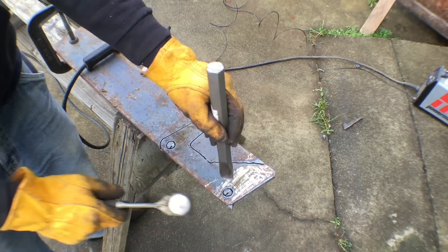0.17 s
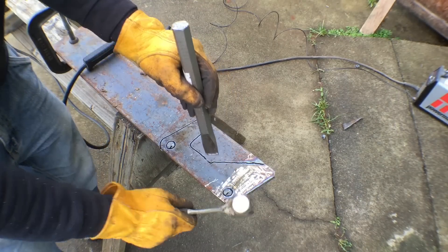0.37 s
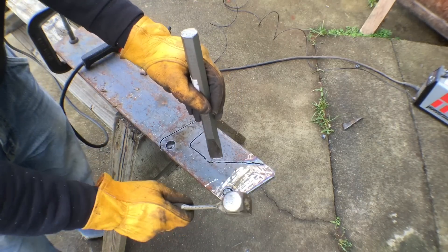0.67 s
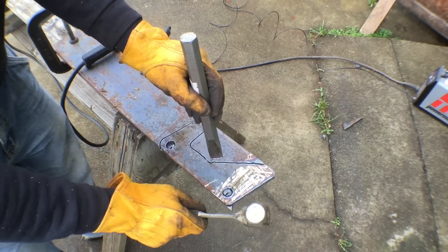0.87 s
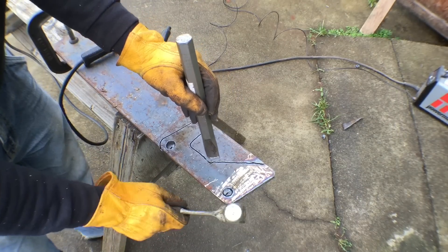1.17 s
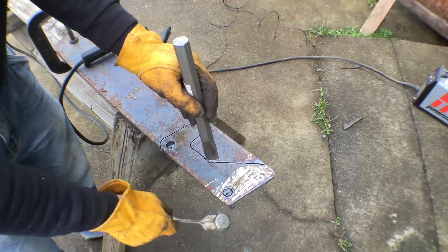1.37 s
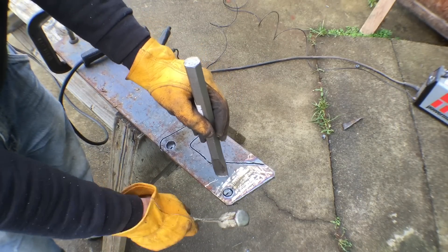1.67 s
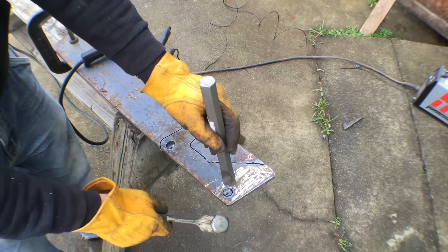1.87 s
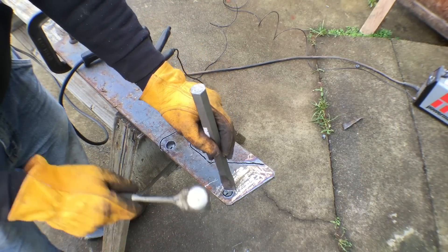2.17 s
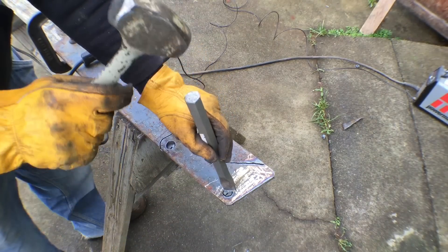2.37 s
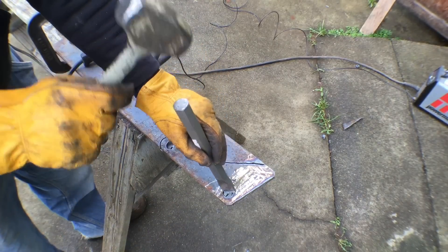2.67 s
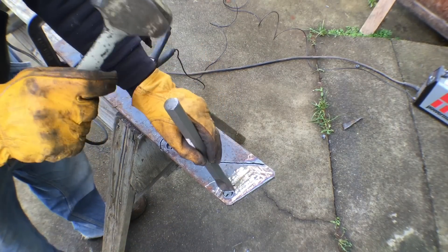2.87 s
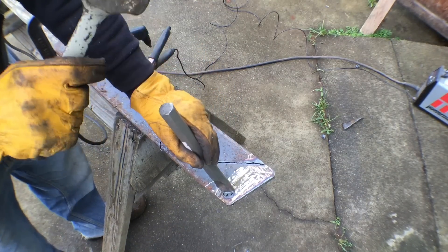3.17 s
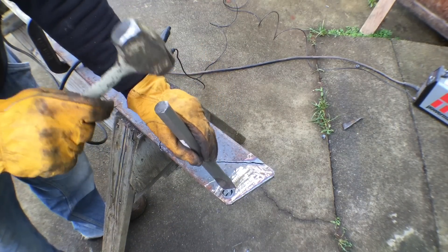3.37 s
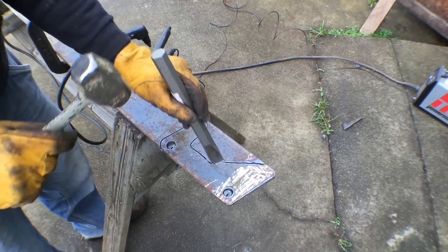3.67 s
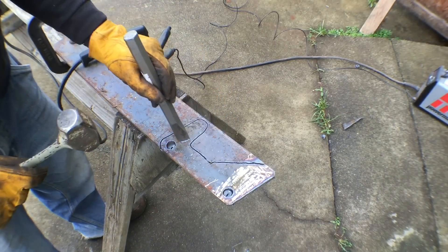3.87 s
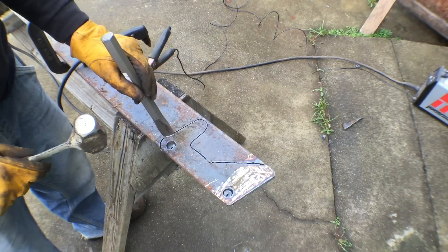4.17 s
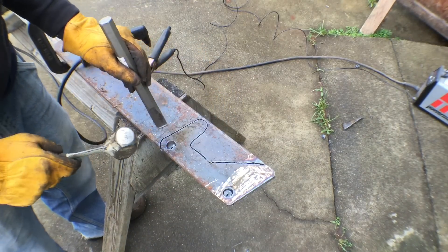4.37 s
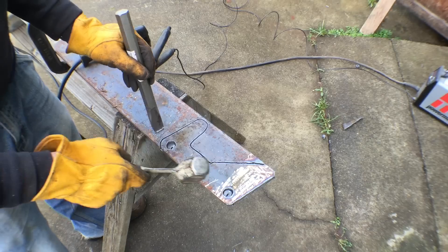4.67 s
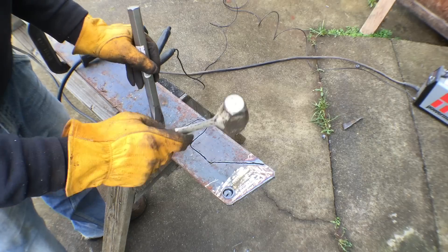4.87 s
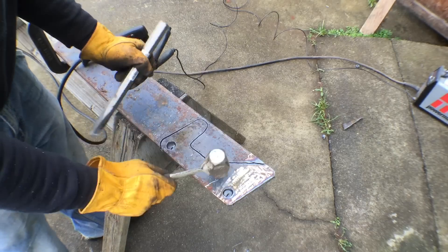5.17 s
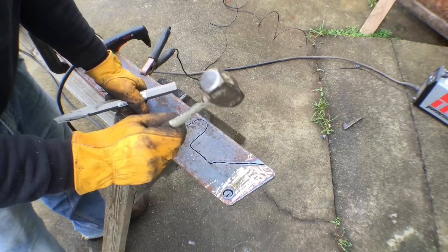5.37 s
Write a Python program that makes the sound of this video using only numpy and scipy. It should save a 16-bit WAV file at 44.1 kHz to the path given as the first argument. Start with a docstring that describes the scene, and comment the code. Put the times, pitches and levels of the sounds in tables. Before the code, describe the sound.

Close, loud steel impacts in a concrete yard. Early on, a few heavy clanks and light rattles of chisel and hammer against a loose plate; then four hard, cracking blows in quick even succession. A gap of about a second and a half holds only a faint distant engine idle and hiss, before small ticks and one very sharp final clang. Short dry decay, faint echoes, peaks slightly overloaded.

```python
"""Hammer and chisel on a loose steel plate

A hammer drives a cold chisel against a loose steel plate on a trestle in a concrete yard.
Contacts excite decaying plate modes and bursts of coloured noise, the clatter strongest near 1.3 kHz.
Hard blows crack and leave the plate shivering; the freed chisel sings high in wavering sines; echoes follow.
Far off, an engine idles as a sum of unsteady orders over a bed of traffic and hiss made of shaped noise.
"""
import sys
import numpy as np
from scipy import signal
from scipy.fft import rfft, irfft, next_fast_len
from scipy.io import wavfile
from scipy.ndimage import uniform_filter1d

SR = 44100
rng = np.random.default_rng(int(sys.argv[2]) if len(sys.argv) > 2 else 0)


def field_ratio(decibels):
    """Amplitude ratio for a level in dB (20 dB per decade); scalars and array-likes work."""
    return 10 ** (np.asarray(decibels, dtype=float) / 20)


def file_out(sig):
    """Save sig as 16-bit WAV at sys.argv[1]."""
    # one column per channel
    cols = np.atleast_2d(sig).T
    # limit, then scale
    lim = np.clip(cols, -1, 1)
    pcm = np.round(lim * 32767).astype(np.int16)
    wavfile.write(sys.argv[1], SR, pcm)


N = 243873

# modes of the steel plate: [f/Hz, relative level/dB, undamped t60/s]
PLATE = [(224.4, -1.5, 0.19), (249.9, -4, 0.35), (362.3, -16.5, 0.74), (546, -4, 0.25), (630, -3, 0.039),
         (830, -8.5, 0.036), (955, -7.5, 0.12), (1071, -3.5, 0.058), (1130, -5, 0.11), (1262, -11, 0.16),
         (1303, -5.5, 0.042), (1391, -15, 0.096), (1475, -11, 0.092), (1595, -14.5, 0.23),
         (1769, -11.5, 0.053), (1875, -10, 0.062), (2080, -15, 0.07), (2280, -25, 0.096), (2730, -26, .09),
         (2959, -15, 0.039), (3070, -16.5, .07), (3180, -26.5, .08), (3250, -23.5, 0.08),
         (3700, -29.5, 0.041)]
# colour of the bright rasp of steel on steel: [f/Hz, relative level per Hz/dB]
RASP_COLOUR = [(1500, -50), (2300, -17), (2900, -13), (3180, -8), (3320, 0), (3500, -7), (3800, -13),
               (4200, -25), (7000, -45)]


def evened(x):
    """Scales to rms 1."""
    return x / np.sqrt(np.mean(x ** 2) + 1e-20)


def read(points, hz):
    """Reads a table of frequencies and values on a log-frequency axis."""
    f, value = np.transpose(points)
    return np.interp(np.log(hz + 1), np.log(f + 1), value)


def add(mix, s, sound):
    """Mixes a sound in at time s, in seconds."""
    part = mix[round(s * SR):][:len(sound)]
    part += sound[:len(part)]


def coloured(white, points):
    """Shapes noise with a spectrum table in dB."""
    hz = np.fft.rfftfreq(len(white), 1 / SR)
    return irfft(rfft(white) * field_ratio(read(points, hz)), len(white))


def wander(per_s):
    """A slow random curve of rms 1: noise averaged over 1 / per_s seconds."""
    steps = rng.standard_normal(N // 256 + 2)
    steps = uniform_filter1d(steps, max(round(SR / 256 / per_s), 1))
    return evened(np.interp(np.arange(N), np.arange(len(steps)) * 256, steps))


def engine():
    """Orders of an unsteady idle that throbs, each order fading in and out over the distance."""
    # orders of the idle: [multiple of the idle rate, level before trim and swell/dB]
    orders = [(3, -67), (4, -60.5), (6, -61.5), (7, -60), (8, -69), (9, -72), (10, -65.5), (12, -77.5),
              (14, -70.5), (18, -86.5), (21, -81.5), (28, -82.5)]
    # swell of the seventh order: [t/s, gain/dB]
    drone = [(0, 3), (.45, 8), (.8, -1), (1.3, -6.5), (1.999, 7.5), (2.501, -3), (3.001, 2.5), (3.5, 1.5),
             (3.9, -13.5), (4.201, 1.5), (4.75, 1), (5.0, -9.5), (5.53, 3)]
    mean_idle_hz, other_orders_trim_db = 20.77, -3.5
    seventh_db = np.interp(np.arange(N) / SR, *np.transpose(drone))
    turns = np.cumsum(mean_idle_hz * (1 + 0.015 * wander(2.9))) / SR
    throb_db = 1.1 * wander(8.4)
    idle = np.zeros(N)
    for multiple, db in orders:
        swell_db = seventh_db if multiple == 7 else other_orders_trim_db
        fade_db = 4.0 * wander(14)
        tone = np.sqrt(2) * np.sin(2 * np.pi * (multiple * turns + rng.random()))
        idle += field_ratio(db + swell_db + throb_db + fade_db) * tone
    return idle


def air():
    """Distant traffic and microphone hiss: one shaped noise, swelling slightly."""
    # colour of the background: [f/Hz, relative level per Hz/dB]
    air_colour = [(15, -43.5), (25, -17), (64, -5.5), (145, -4), (230, -12.5), (286, -10), (336, -13),
                  (680, -21.5), (941, -19.5), (1340, -8.5), (1710, -17.5), (2630, -26), (7160, -32.5),
                  (13700, -34.5), (15900, -38), (16400, -69)]
    hiss = coloured(rng.standard_normal(next_fast_len(N)), air_colour)[:N]
    return field_ratio(-63 + 0.16 * wander(4.3)) * evened(hiss)


def plate_modes():
    """One dying sine for each plate mode; neighbours start in opposite phase."""
    hz, db, t60 = np.transpose(PLATE)[:, :, None]
    t = np.arange(14000) / SR
    sign = (-1.) ** np.arange(len(PLATE))[:, None]
    return sign * field_ratio(db - 60 * t / t60) * np.sin(2 * np.pi * hz * t)


def contact(modes, level_db, sizzle_db, decay_s, spot_hz):
    """A knock and its chatter ring the plate's modes; countless close modes sound as a dying clatter."""
    # colour of the dense clatter: [f/Hz, relative level per Hz/dB]
    clatter_colour = [(59, -47.5), (100, -19.5), (212, -1), (380, -7.5), (574, -4), (795, -7.5),
                      (927, -6.5), (1010, -3), (1330, 0), (1550, -6), (2260, -23.5), (2820, -22.5),
                      (4410, -48.5), (6000, -62), (7800, -57.5), (13200, -120)]
    # colour of its treble sizzle: [f/Hz, relative level per Hz/dB]
    sizzle_colour = [(2650, -48.5), (4500, -10), (5780, -8), (6370, -14), (6610, -9), (7280, -15),
                     (7760, -5), (8680, 5.5), (10800, -13), (11600, -22), (12200, -9), (12600, -20.5),
                     (13400, -5), (14200, -10), (16100, -17.5)]
    t = np.arange(modes.shape[1]) / SR
    decay_s = np.clip(decay_s, .01, .4)
    white = rng.standard_normal((4, len(t)))
    # sizzling and hard contacts bite more above about 2 kHz
    bright_db = sizzle_db + 26
    bite_db = 0.6 * bright_db + 0.073 * level_db
    # light or dull contacts thud more, as do places that favour a low pitch
    thud_db = -11.5 - 0.11 * level_db - 0.12 * bright_db - 2.5 * np.log2(spot_hz / 1200)
    # light contacts start slower, brief ones sharper
    soft = field_ratio(-.35 * level_db) * min(decay_s / .06, 1) ** 2

    mode_hz = np.transpose(PLATE)[0]
    # the place of the blow favours the modes near one pitch
    favour_db = 14 * np.exp(-(np.log(mode_hz / spot_hz) / .025) ** 2)
    low_mode_db = (thud_db - 0.5) * np.clip((800 - mode_hz) / 500, 0, 1)
    weight = field_ratio(favour_db + low_mode_db + bite_db * (mode_hz > 2000))
    deep = mode_hz < 600
    chatter = white[0] * field_ratio(-15.5 - 60 * t / (.5 * decay_s))
    chatter[0] += 1  # the knock
    # a contact that settles fast also damps the upper modes; the deep ones ring on
    struck = (weight * deep) @ modes + (weight * ~deep) @ modes * field_ratio(-11 * t / decay_s)
    ring = signal.fftconvolve(chatter, struck)[:len(t)] * (1 - np.exp(-t / (0.0013 * soft)))

    hz = np.fft.rfftfreq(len(t), 1 / SR)
    bite = field_ratio(bite_db / (1 + (1900 / (hz + 1)) ** 4))
    body = rfft(evened(coloured(white[1], clatter_colour))) * bite
    low = 1 / (1 + (hz / 650) ** 6)
    bass, upper = irfft(body * low, len(t)), irfft(body * (1 - low), len(t))
    rasp, sizzle = evened(coloured(white[3], RASP_COLOUR)), evened(coloured(white[2], sizzle_colour))
    # bass swells slowly and lasts, treble starts at once: (sound, level/dB, rise/s, decay factor)
    bands = ((bass, thud_db + 13, .006, 1.5),
             (upper, 0, .0008 * soft, 1.05),
             (rasp, bite_db - 25, .0005 * soft, 1.2),
             (sizzle, sizzle_db + 1.0, 0.00018 * soft, 1.3))
    clatter = sum(field_ratio(db - 60 * t / (last * decay_s)) * (1 - np.exp(-t / rise)) * band
                  for band, db, rise, last in bands)
    # light taps clatter less and ring more purely
    ring_db, clatter_db = -22.5 - 0.27 * level_db, -8 + 0.09 * level_db
    return field_ratio(level_db) * (field_ratio(ring_db) * ring + field_ratio(clatter_db) * clatter)


def yard(x):
    """Diffuse echoes from walls and ground, each band dying at its own speed."""
    # decay of the echoes: [f/Hz, t60/s]
    echo_decay = [(150, 0.27), (600, 0.29), (1500, 0.31), (4000, 0.32), (12000, 0.56)]
    hz, t, z = signal.stft(rng.standard_normal(SR), SR, nperseg=256)
    dying = z * field_ratio(-60 * t / read(echo_decay, hz)[:, None])
    tail = signal.istft(dying, SR, nperseg=256)[1]
    tail[:400] = 0  # a 9 ms gap before the first echo
    return signal.fftconvolve(x, tail / np.linalg.norm(tail))[:N]


def shiver(modes, length_s, first_db, t60, linger_db, rasp_db):
    """Tiny uneven taps of the plate on its rest keep its modes going over a dull body and brighter rasp."""
    # colour of the dull body: [f/Hz, relative level per Hz/dB]
    body_colour = [(100, -24), (250, -4), (400, -6.5), (550, -5), (800, -11), (1100, -14.5), (1400, 1.5),
                   (1650, -9), (2000, -16), (2600, -31.5), (5000, -72.5)]
    linger_rasp_db, fade_s = -34.5, .015
    t = np.arange(0, length_s, 1 / SR)
    lumps = evened(uniform_filter1d(rng.standard_normal(SR // 2 + modes.shape[1]), 300))
    taps = rng.standard_normal(len(lumps)) * field_ratio(1.4 * lumps)
    ring = evened(signal.fftconvolve(taps, modes.sum(0), "valid")[:len(t)])
    body = evened(coloured(taps[:len(t)], body_colour))
    rasp = evened(coloured(taps[:len(t)], RASP_COLOUR))
    dying, lingering = field_ratio(first_db - 60 * t / t60), field_ratio(linger_db)
    rasp_level = dying * field_ratio(rasp_db) + lingering * field_ratio(linger_rasp_db)
    sound = (dying + lingering) * (0.36 * ring + 0.97 * body) + rasp_level * rasp
    return sound * np.clip(np.minimum(t, t[::-1]) / fade_s, 0, 1)


def chisel(db, tilt_db):
    """A few lengthwise modes of the steel bar, wavering as the glove grips it."""
    # modes of the chisel: [f/Hz, relative level/dB, t60/s, share of the tilt]
    bar_modes = [(8450, 0, .11, -.4), (8630, -12, .08, 0), (9399, -8, .08, .6), (11500, -20, .09, 0),
                 (11970, -22, .07, 0), (13880, -13, .1, 0), (15430, -25, .14, .1)]
    t = np.arange(12000) / SR
    slow = uniform_filter1d(rng.standard_normal((len(bar_modes), len(t))), 150, axis=1)
    flutter = 1 + .45 * evened(slow)
    song = np.zeros(len(t))
    for (hz, level, t60, share), wobble in zip(bar_modes, flutter):
        song += field_ratio(db + level + share * tilt_db - 60 * t / t60) * np.sin(2 * np.pi * hz * t) * wobble
    return song * (1 - np.exp(-t / 0.0028))


def crack(db):
    """The first instant of a hard strike: a few cycles of heavily damped ringing."""
    # damped tones of the crack: [f/Hz, relative level/dB, t60/s]
    crack_tones = [(1394, 0.5, 0.0058), (3530, -11, 0.0051), (9400, -13, 0.0028), (16310, -24, 0.0028)]
    t = np.arange(1500) / SR
    tones = sum(field_ratio(db + level + 8.0 - 60 * t / t60) * np.sin(2 * np.pi * hz * t)
                for hz, level, t60 in crack_tones)
    return tones * (1 - np.exp(-t / 0.00057))


def scene():
    """Steel, its echoes and the background."""
    # contacts of steel on steel: [t/s, strike level/dB, sizzle level re strike/dB,
    # decay scale/s, favoured plate pitch f/Hz]
    contacts = [(0.491, -13.5, -21.5, 0.062, 630), (.498, -3.5, -41.5, 0.071, 1094),
                (.507, -12, -29.5, 0.14, 1262), (0.522, -19, -21.5, 0.15, 1135),
                (0.561, -28.5, -20.5, 0.16, 1584), (.65, -40, -52, .2, 252.7),
                (0.771, -35.5, -45, 0.062, 1475), (.810, -4.5, -30.5, 0.055, 955),
                (.816, 0, -36.5, 0.042, 955), (.825, -12, -26.5, 0.14, 1475),
                (.893, -32.5, -15.5, 0.12, 1475), (.9935, -38.5, -52, 0.093, 1490),
                (1.068, -8.5, -27, 0.11, 1071), (1.242, -40.5, -48, 0.1, 630),
                (1.359, -23, -18.5, 0.096, 1230), (1.696, -17.5, -29, 0.052, 1071),
                (1.706, -16.5, -27, 0.087, 1071), (1.9305, -22.5, -27, 0.022, 1475),
                (1.948, -35.5, -23, 0.029, 1391), (2.008, -38, -26, 0.04, 1475),
                (2.103, -35.5, -56.5, 0.082, 1060), (2.529, -3.5, -22, 0.076, 1475),
                (2.539, -4.5, -27, 0.093, 1303), (2.586, -19.5, -35, 0.063, 1112),
                (2.799, 0.5, -27.5, 0.053, 1262), (2.805, -2.5, -20.5, 0.083, 1391),
                (2.833, -17.5, -28, 0.094, 1303), (2.862, -15, -31.5, 0.038, 1303),
                (2.963, -41.5, -39.5, .052, 830), (3.06, -5, -14.5, 0.045, 1066),
                (3.069, -1, -26, 0.1, 1391), (3.15, -21.5, -29.5, 0.058, 955),
                (3.225, -41.5, -38, 0.06, 1303), (3.371, 2.5, -24, 0.057, 1262),
                (3.387, -4.5, -22.5, 0.074, 1303), (3.434, -24.5, -20.5, 0.11, 1475),
                (3.466, -30.5, -27.5, 0.095, 955), (3.541, -41, -36, 0.04, 830),
                (4.984, -28.5, -55, 0.038, 630), (4.996, -32, -54.5, .07, 630),
                (5.134, -34.5, -62, 0.039, 830), (5.141, -37, -51, 0.076, 1140),
                (5.214, 2.5, -13.5, 0.043, 1262), (5.222, -4.5, -12.5, 0.097, 1163),
                (5.266, -28, -14, 0.14, 1262), (5.298, -31, -24, 0.054, 1391),
                (5.346, -35.5, -21, 0.22, 1391)]
    # shivers of the loose plate against the trestle after hard blows, dying fast, then lingering:
    # [start t/s, end t/s, first level/dB, t60/s, lingering level/dB, rasp level re first/dB]
    shivers = [(0.531, 0.817, -30.5, 0.33, -53, -19.5), (0.841, 1.07, -27, 0.25, -64, -21.5),
               (1.098, 1.342, -28, 0.25, -77, -23), (2.58, 2.82, -29.5, 0.082, -62, -15.5),
               (2.868, 3.08, -33, 0.1, -63.5, -24), (3.104, 3.29, -31.5, 0.25, -67, -26),
               (3.407, 3.617, -36.5, 0.34, -62, -20), (5.25, 5.551, -34, 0.28, -51, -14)]
    # the chisel jumps free and rings: [t/s, level/dB, tilt from its first toward its third listed mode/dB]
    rings = [(1.069, -36, 21.5), (1.359, -39.5, 12), (1.694, -46.5, 21), (2.532, -31, -7.5),
             (2.547, -31.5, -7.5), (2.802, -50, -11), (3.063, -43.5, 20), (3.374, -28.5, 8),
             (4.989, -66.5, -29), (5.137, -73, -18.5), (5.213, -36, -8)]
    # hard, sharp strikes that open with a crack: [t/s, relative level/dB]
    cracks = [(2.5292, -3.5), (2.799, 0), (3.061, 0), (3.3711, -1), (5.2156, 5.5)]
    steel, modes = np.zeros(N), plate_modes()
    for s, *row in contacts:
        add(steel, s, contact(modes, *row))
    for start, end, *row in shivers:
        add(steel, start, shiver(modes, end - start, *row))
    for s, *row in rings:
        add(steel, s, chisel(*row))
    for s, db in cracks:
        add(steel, s, crack(db))
    return (engine() + air() + steel + field_ratio(-31.5) * yard(steel))[None]


def top_cut(x):
    """Nothing passes above the cut-off."""
    return signal.sosfilt(signal.butter(12, 16290, fs=SR, output="sos"), x)


def record(dry):
    """The microphone drops the deep bass and the input clips at full scale."""
    thin = signal.sosfilt(signal.butter(2, 50, "high", fs=SR, output="sos"), dry)
    return top_cut(np.clip(thin, -1, 1))


dry = scene()
out = record(dry)
file_out(out)
```